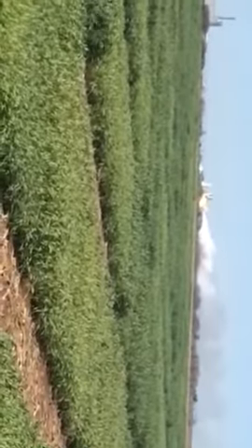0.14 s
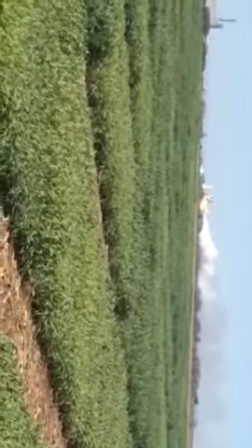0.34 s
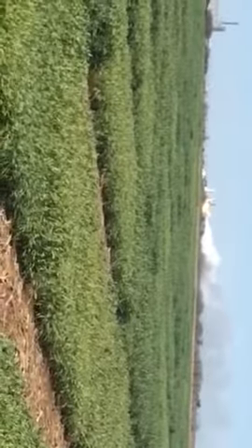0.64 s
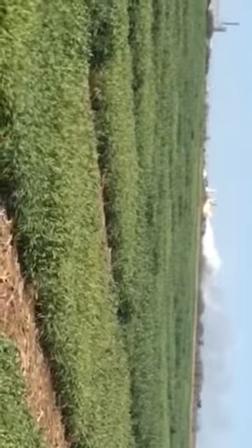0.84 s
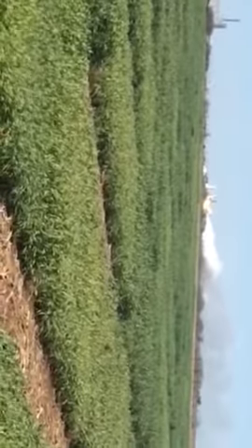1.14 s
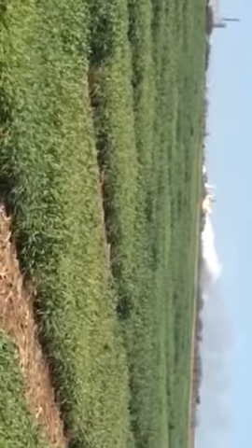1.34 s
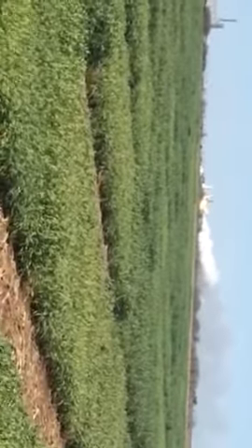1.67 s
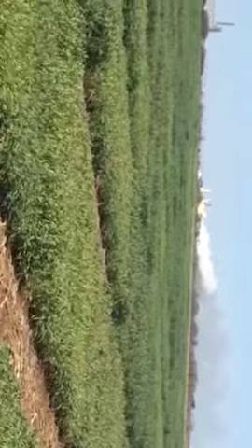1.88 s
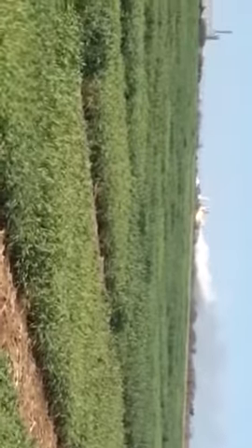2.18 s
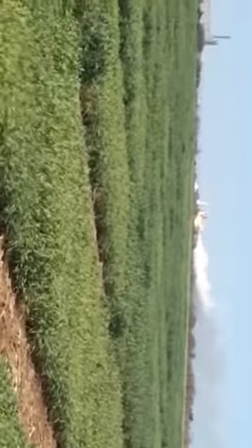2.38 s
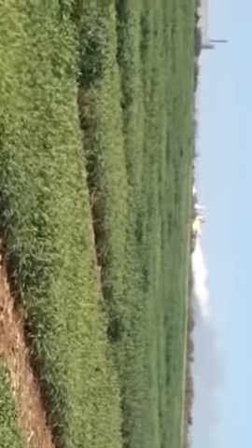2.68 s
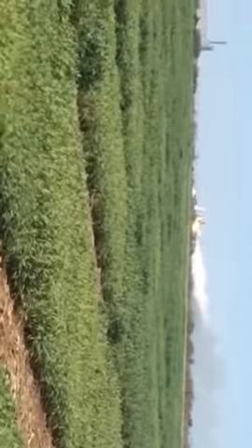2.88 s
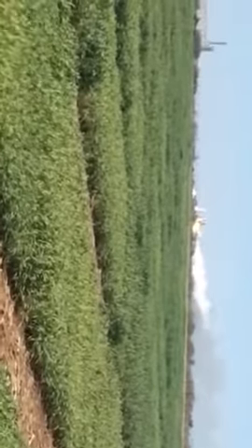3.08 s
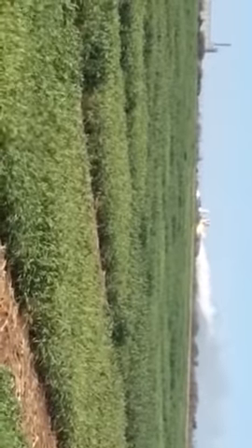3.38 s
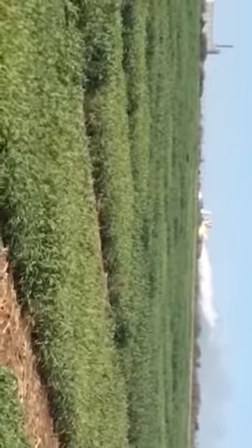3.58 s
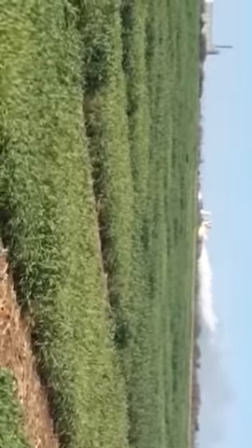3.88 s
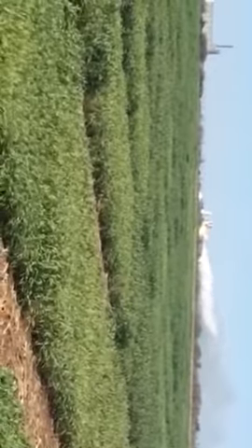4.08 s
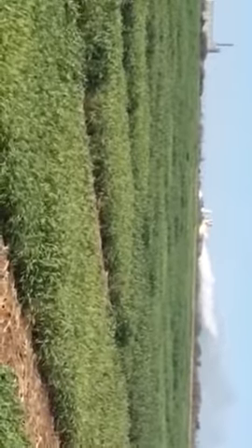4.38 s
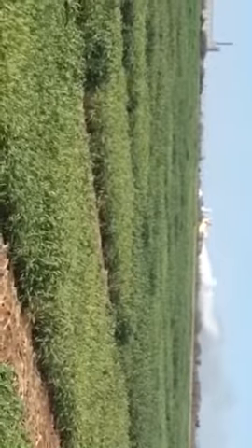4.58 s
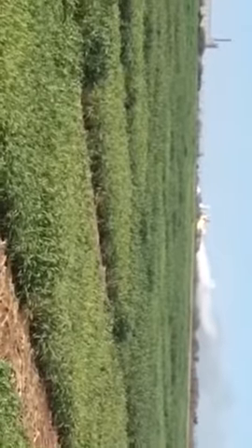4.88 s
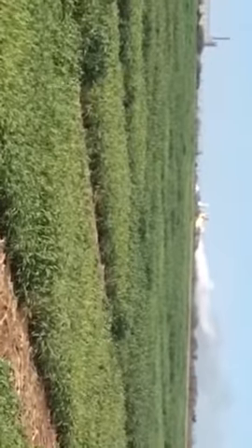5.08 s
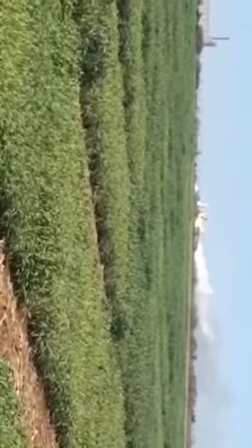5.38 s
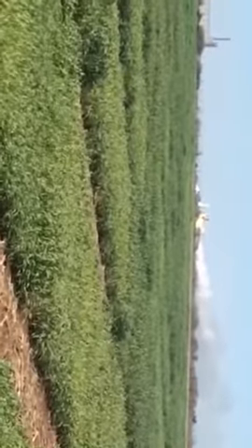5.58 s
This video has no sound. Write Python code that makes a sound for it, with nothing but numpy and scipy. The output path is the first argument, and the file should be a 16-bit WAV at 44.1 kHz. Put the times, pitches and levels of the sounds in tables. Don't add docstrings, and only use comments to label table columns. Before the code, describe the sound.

A rocket engine burns far off across open farmland, heard in mono on a phone microphone for nearly six seconds. Its roar is already running: steady, broad noise, strongest around 400 to 550 Hz, with little treble, its colour drifting and twinkling as turbulent air carries it. In front, louder and lower, wind flutters and thumps on the microphone from about 40 to 200 Hz. Bumps come irregularly, with firm ones near 1.0 and 1.4 seconds, the latter with a tiny capsule rattle, a heavy one at 3.1, another at 3.9, then more at 5.0 and 5.6. Around 3.5 the wind eases somewhat between gusts. At about 4.1, and more weakly at 4.6, the roar briefly brightens. Leaf and microphone hiss and thin circuit tones stay almost inaudible beneath. Everything is cut off abruptly, roar continuing, on a last small wind push.

```python
import sys
import numpy as np
from scipy import signal
from scipy.fft import rfft, irfft, next_fast_len
from scipy.io import wavfile
from scipy.ndimage import uniform_filter1d

SR = 44100
rng = np.random.default_rng(int(sys.argv[2]) if len(sys.argv) > 2 else 0)


def to_linear_factor(level_db):
    exponent = np.asarray(level_db, float) / 20
    return 10 ** exponent


def pcm_store(signal):
    levels = np.round(np.clip(np.atleast_2d(signal), -1, 1) * 32767)
    wavfile.write(sys.argv[1], SR, levels.astype(np.int16).T)


N = 252693
TIME_S = np.arange(N) / SR


def level(x, db):
    return x * to_linear_factor(db) / np.sqrt(np.mean(x ** 2))


def curve(table):
    time_s, *columns = np.transpose(table)
    return [np.interp(TIME_S, time_s, column) for column in columns]


def walk(rate_hz):
    hold = int(SR / rate_hz)
    held = np.repeat(rng.standard_normal(N // 200), hold)[:N]
    return 0.8 * uniform_filter1d(uniform_filter1d(held, hold), hold)


def bell(x):
    return np.exp(-0.5 * x ** 2)


def bands(colour, per_octave=3):
    size = next_fast_len(N)
    octave = np.log2(np.arange(1, size // 2 + 2) * SR / size)
    pitch_hz, level_db = np.transpose(colour)
    shape_db = np.interp(octave, np.log2(pitch_hz), level_db, left=-200, right=-200)
    noise = rfft(rng.standard_normal(size)) * to_linear_factor(shape_db)
    step = 1 / per_octave
    for centre in np.arange(np.log2(pitch_hz[0]), np.log2(pitch_hz[-1]) + step, step):
        share = np.clip(1 - abs(octave - centre) * per_octave, 0, 1)
        yield 2 ** centre, irfft(noise * share, size)[:N]


# start_s [s], level_db [dB], hump_hz [Hz], hump_db [dB], clear_air_db [dB]
ROAR_PATH = [(0.0, -38.5, 463, -1, 1.5), (0.3, -33.5, 497, -1.5, -1), (0.62, -35, 447, -1.5, 2.5),
             (0.95, -34.5, 425, 2.5, 0.5), (1.25, -34.5, 438, 2.5, 0), (1.55, -35, 462, 3, 1),
             (1.9, -32.5, 504, 2.5, -2.5), (2.2, -35, 542, -1, 2), (2.55, -32, 457, -0.5, -1.5),
             (2.9, -33, 467, -2, -1.5), (3.2, -35.5, 430, 4.5, 2), (3.55, -31.5, 432, 2.5, -1.5),
             (3.85, -34.5, 425, 0.5, 2), (4.25, -34, 516, -4.5, -3), (4.6, -33, 498, -2.5, -1),
             (5.05, -34.5, 482, -2, -4), (5.4, -36.5, 492, 0, 0), (5.72, -32.5, 478, -0.5, -5)]
# pitch_hz [Hz], level_db [dB per Hz]
ROAR_COLOUR = [(140, -28), (230, -8), (282, -8), (367, 0), (454, 1), (545, 1.5), (674, -3), (943, -3.5),
               (1090, -9), (1400, -13), (1860, -25.5), (2600, -49.5), (3380, -74.5), (5720, -120)]
# start_s [s], level_db [dB]
CLEAR_MOMENTS = [
    (4.125, 6),
    (4.61, 3.5),
]


def clear_air(clear_db):
    clear_db = clear_db + 0.6 * walk(5.7)
    clear_db = clear_db + 1.2 * walk(12)
    moment_length_s = 0.022
    for start_s, level_db in CLEAR_MOMENTS:
        clear_db = clear_db + level_db * bell((TIME_S - start_s) / moment_length_s)
    return clear_db - clear_db.mean()


def roar():
    low_hz, high_hz, hump_width_oct = 380, 523, 0.15
    air_hz = 1820
    level_db, hump_hz, hump_db, clear_db = curve(ROAR_PATH)

    slide_oct = np.log2(hump_hz / np.sqrt(low_hz * high_hz)) + 0.024 * walk(4.1)
    lean_db = 14 * slide_oct
    halves = [(low_hz, hump_db - lean_db), (high_hz, hump_db + lean_db)]

    plain, heard = 0, 0
    fading = walk(9)
    clear_db = clear_air(clear_db)
    for pitch_hz, band in bands(ROAR_COLOUR, per_octave=4):
        fading = 0.7 * fading + 0.7 * walk(9)
        change_db = min(pitch_hz / air_hz, 1.2) ** 2 * clear_db
        for half_hz, half_db in halves:
            closeness = bell(np.log2(pitch_hz / half_hz) / hump_width_oct)
            change_db = change_db + closeness * (half_db - half_db.mean() + 1.0 * fading)
        twinkle_db = 1.2 * fading + 1.0 * walk(22)
        plain = plain + band
        heard = heard + band * to_linear_factor(change_db + twinkle_db)
    return heard * to_linear_factor(level_db + 4.5) / np.std(plain)


# start_s [s], level_db [dB]
WIND = [(0.0, -25), (0.24, -31), (0.48, -30.5), (0.62, -29), (0.86, -30), (1.03, -27), (1.99, -28.5),
        (2.07, -30), (2.58, -31), (2.77, -28.5), (2.93, -28.5), (3.14, -28), (3.43, -35), (3.94, -27),
        (4.01, -30.5), (4.43, -32), (5.1, -29.5), (5.72, -31)]
# pitch_hz [Hz], level_db [dB per Hz]
WIND_COLOUR = [(15, -33.5), (25, -22.5), (38, -4.5), (55, 2.5), (120, 1.5), (180, -1.5), (230, -9.5),
               (290, -16), (360, -26.5)]


def buffeting():
    flutter_db = 0.5
    together = walk(35)
    low = 0
    for _, band in bands(WIND_COLOUR, per_octave=2):
        low = low + band * to_linear_factor(flutter_db * (0.6 * together + 0.8 * walk(9)))
    return level(low, 0) * to_linear_factor(curve(WIND)[0])


# pitch_hz [Hz], level_db [dB per Hz]
HISS_COLOUR = [(1500, -10.5), (2300, -4.5), (3000, -0.5), (3550, -6.5), (4400, -6), (5200, -11.5),
               (6000, -14), (8000, -18), (10000, -22), (12000, -23.5), (15500, -25)]


def hiss():
    noise = sum(band * to_linear_factor(0.6 * walk(12)) for _, band in bands(HISS_COLOUR, per_octave=2))
    return level(noise, -69.5)


# multiple [times the base pitch], level_db [dB]
WHINE = [(4, -93), (5, -91), (6, -96), (7, -96)]


def whine():
    base_hz = 740.5
    return sum(to_linear_factor(db) * np.sin(2 * np.pi * multiple * base_hz * TIME_S) for multiple, db in WHINE)


# multiple [times the base pitch], level_db [dB]
BUZZ = [(5, -90), (6, -96), (7, -94), (8, -94), (9, -98)]


def buzz():
    base_hz = 920.0
    cycles = np.cumsum(base_hz * (1 + 0.005 * walk(120))) / SR
    return sum(to_linear_factor(db) * np.sin(2 * np.pi * multiple * cycles) for multiple, db in BUZZ)


def small_eddies(count=45):
    start_s = (np.arange(count) + rng.random(count)) * N / SR / count
    length_chance, level_chance, pitch_chance = rng.standard_normal((count, 3)).T
    cycles = 0.8 * 2 ** length_chance.clip(-1.5, 1.7)
    pitch_hz = 106.3 * 2 ** (0.47 * pitch_chance.clip(-2, 2))
    wind_db = np.interp(start_s, *np.transpose(WIND))
    peak_db = wind_db + 7 + 0.5 * level_chance - 8 * np.log10(cycles)
    return list(zip(start_s, peak_db, pitch_hz, cycles))


# start_s [s], peak_db [dB], pitch_hz [Hz], length_cycles [cycles]
STRONG_EDDIES = [(0.044, -19, 65, 0.79), (0.173, -22, 70, 1.16), (0.466, -17, 71.4, 1.6),
                 (0.588, -15.5, 139, 0.7), (0.871, -17.5, 109, 0.71), (1.021, -12, 138, 0.74),
                 (1.253, -13.5, 172, 0.35), (1.366, -14, 127, 0.22), (1.424, -10, 146.5, 0.81),
                 (1.6, -23.5, 122, 0.49), (1.67, -18, 104, 0.85), (1.81, -17, 131, 1.3),
                 (2.046, -14, 179, 0.64), (2.101, -15.5, 78, 0.34), (2.364, -21.5, 130, 2.1),
                 (2.502, -17.5, 143, 0.38), (2.73, -19, 108, 0.88), (2.806, -16.5, 215, 0.93),
                 (2.95, -21.5, 99, 0.54), (3.134, -9, 85, 0.29), (3.339, -15.5, 86, 0.5),
                 (3.663, -22, 99.5, 0.93), (3.82, -20.5, 78.4, 1.4), (3.916, -13, 191, 0.69),
                 (4.214, -17, 102.5, 1.24), (4.277, -16.5, 107, 0.41), (4.554, -21.5, 80.4, 0.86),
                 (5.001, -12.5, 92, 0.46), (5.163, -14.5, 90, 0.68), (5.63, -11, 134, 0.28)]


def fronts():
    return [(s - 0.003, db - 13, 1.9 * hz, cycles) for s, db, hz, cycles in STRONG_EDDIES]


def wakes():
    return [(s + 0.02256, db - 11.5, 0.75 * hz, 1.3) for s, db, hz, _ in STRONG_EDDIES]


def gusts():
    out = np.zeros(N)
    reach_s = 0.12
    for start_s, peak_db, pitch_hz, length_cycles in STRONG_EDDIES + small_eddies() + fronts() + wakes():
        first = max(int((start_s - reach_s) * SR), 0)
        last = min(int((start_s + reach_s) * SR), N)
        i = np.arange(first, last)
        cycle = (i / SR - start_s) * pitch_hz
        swing = np.cos(2 * np.pi * (cycle + rng.random()))
        out[i] += to_linear_factor(peak_db) * bell(cycle / length_cycles) * swing
    return out


# start_s [s], peak_db [dB], length_s [s]
RATTLE = [
    (1.421, -54, .002),
    (1.429, -61, .003),
]


def rattle():
    colour = [(1300, -6), (2000, 2), (3100, -4), (3800, -22)]  # (Hz, dB per Hz)
    noise = level(sum(band for _, band in bands(colour)), 0)
    return noise * sum(to_linear_factor(db) * bell((TIME_S - s) / length_s) for s, db, length_s in RATTLE)


def end_click():
    time_left_s, length_s = TIME_S[::-1], 0.002
    return -to_linear_factor(-24) * bell(time_left_s / length_s)


def scene():
    floor = hiss() + whine() + buzz()
    wind = buffeting() + gusts() + rattle() + end_click()
    return (roar() + wind + floor)[None]


def band_limit(x):
    return signal.sosfilt(signal.butter(12, 15270, fs=SR, output="sos"), x)


def record(dry):
    opened = dry * np.clip(TIME_S / 0.003, 0, 1)
    return band_limit(opened)


dry = scene()
out = record(dry)
pcm_store(out)
```